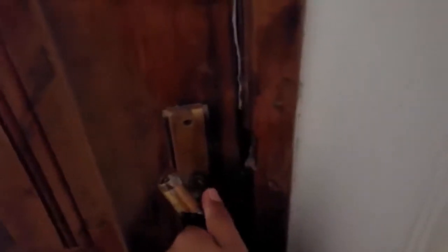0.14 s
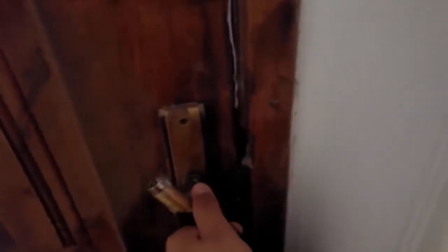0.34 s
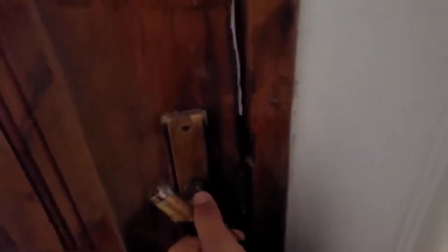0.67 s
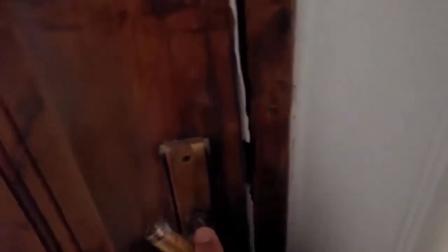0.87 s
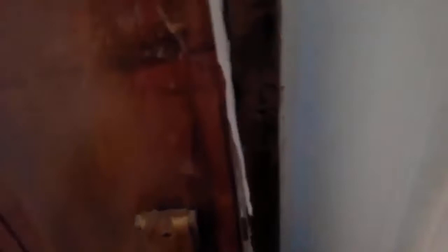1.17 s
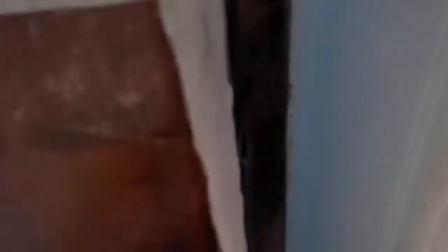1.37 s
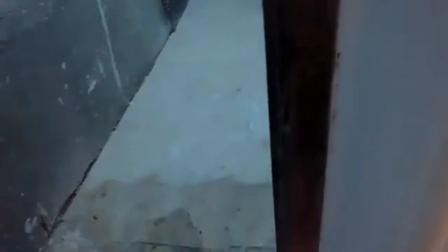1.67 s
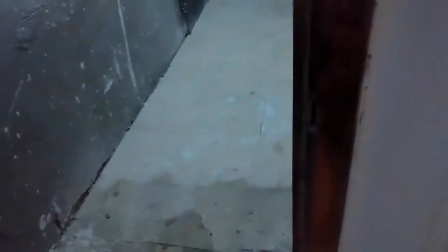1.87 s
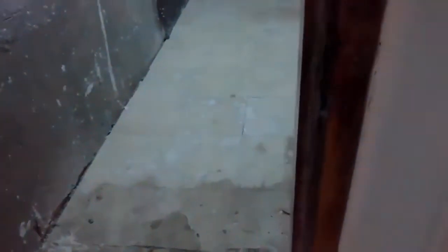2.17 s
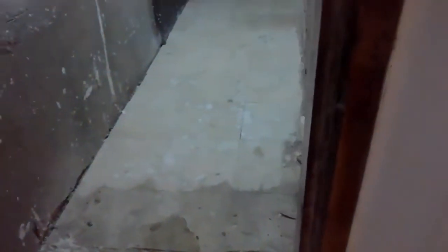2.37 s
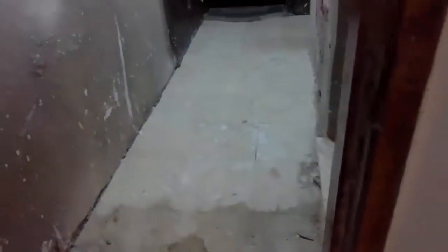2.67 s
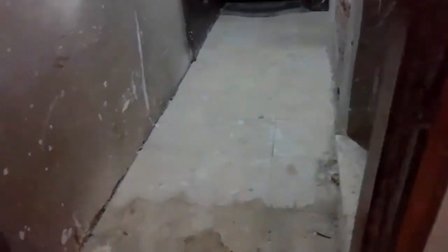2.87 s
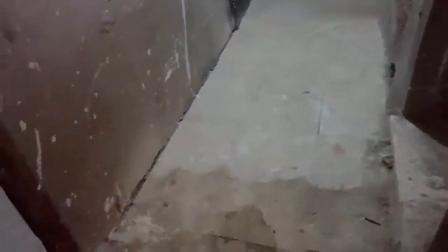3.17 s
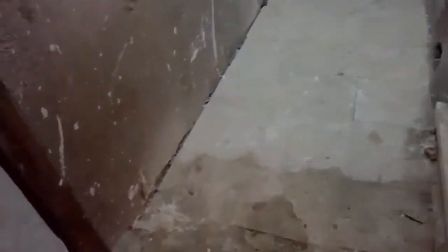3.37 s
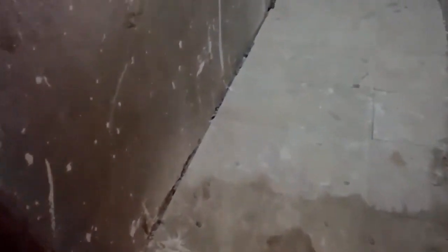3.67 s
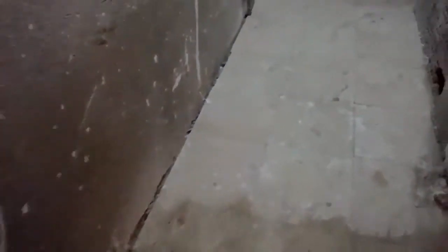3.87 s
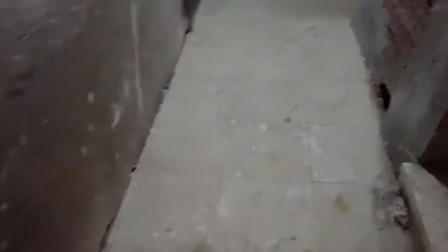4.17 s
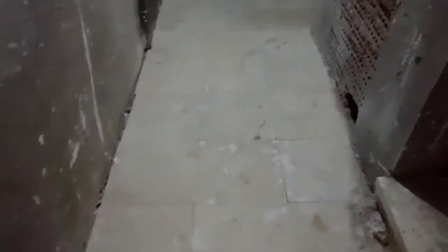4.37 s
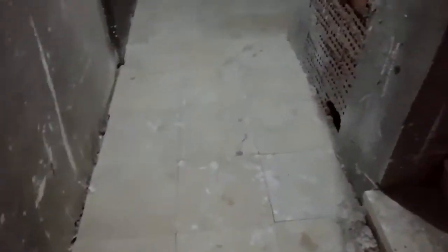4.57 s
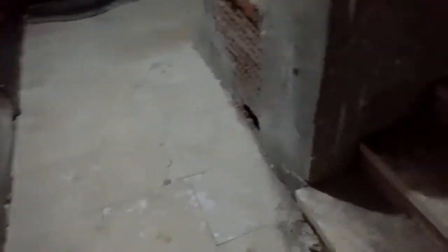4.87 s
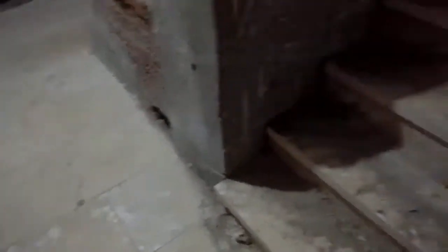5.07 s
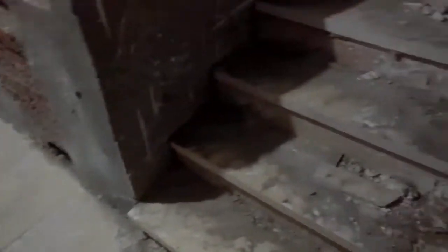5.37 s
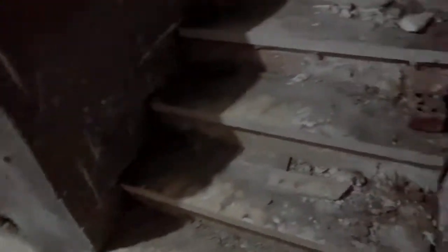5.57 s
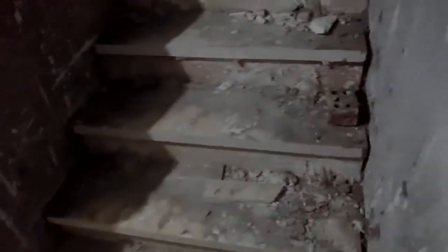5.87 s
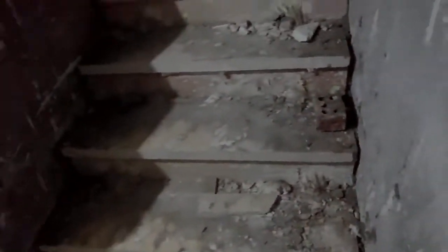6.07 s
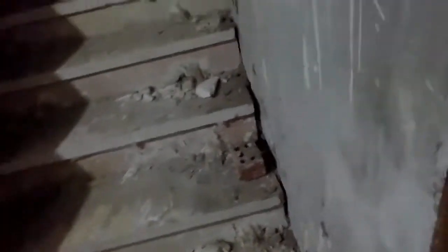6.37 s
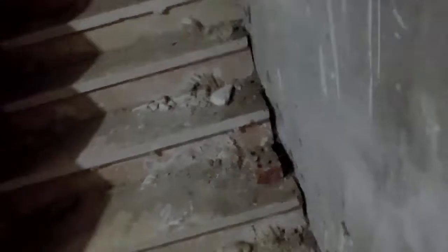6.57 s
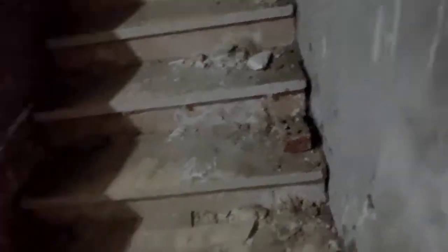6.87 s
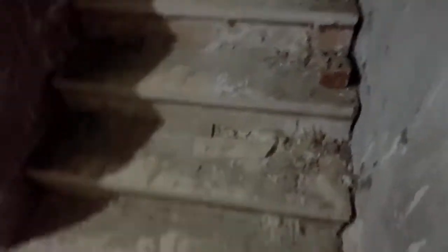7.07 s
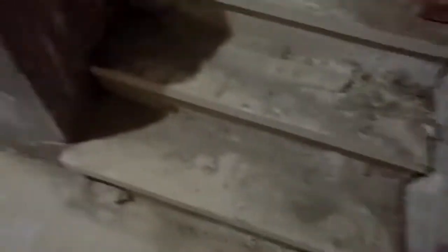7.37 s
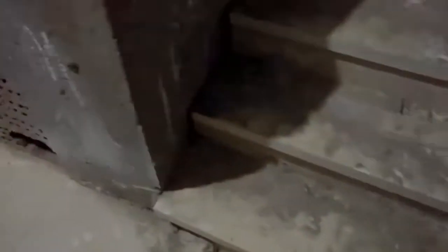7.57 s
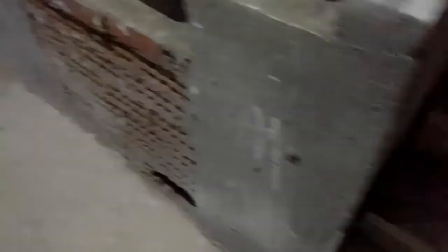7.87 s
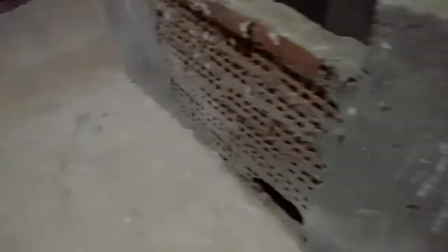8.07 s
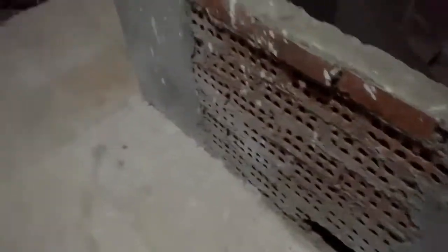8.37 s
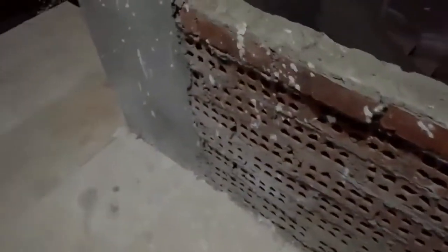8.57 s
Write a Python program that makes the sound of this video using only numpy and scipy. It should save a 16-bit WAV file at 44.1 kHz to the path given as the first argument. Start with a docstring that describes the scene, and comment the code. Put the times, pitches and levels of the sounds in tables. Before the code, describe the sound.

Faint metal clicks and cloth rustle, a soft door release, quiet scuffs, a creaking hinge, then one violent wooden slam with echoing boom.

```python
"""A wooden door: a hand works its latch and pulls it open; it swings back, scrapes its frame and slams.
Knocks are coloured noise bursts plus decaying modes of leaf, plate and bolt; standing waves boom in the stairwell.
Sleeve rustle, shoe scuffs and rubbing are grainy filtered noise; hinge and sole squeak as gliding resonances.
Bare concrete echoes; a far motor hums underneath as wavering sine orders, over still air."""
import sys
import numpy as np
from scipy import signal
from scipy.fft import rfft, irfft, next_fast_len
from scipy.io import wavfile
from scipy.ndimage import uniform_filter1d

SR = 44100
rng = np.random.default_rng(int(sys.argv[2]) if len(sys.argv) > 2 else 0)


def pcm_store(signal):
    """Save signal as 16-bit PCM."""
    levels = np.round(np.clip(np.atleast_2d(signal), -1, 1) * 32767)
    wavfile.write(sys.argv[1], SR, levels.astype(np.int16).T)


N = 384852
TIME_S = np.arange(N) / SR

# Spectrum of a small metal or cloth tick. Each row: frequency in Hz, level in dB per Hz.
CLICK_SPECTRUM = [(100, -18), (600, -4.5), (1500, -0.5), (6000, -1), (15000, -12.5)]
# Lean of near sounds. Each row: frequency in Hz, left minus right in dB.
LEFT_LEAN = [(100, -3.5), (600, 4), (1100, 4), (2000, 0.5), (4000, 7.5), (8000, 13.5), (15000, 6)]


def gain_of(db):
    """Decibels to an amplitude factor."""
    return 10 ** (np.asarray(db) / 20)


def evened(x):
    """Scales to rms 1."""
    return x / np.sqrt(np.mean(x ** 2) + 1e-20)


def read(points, hz):
    """Interpolates a table on a log-frequency axis."""
    f_hz, value = np.transpose(points)
    return np.interp(np.log(hz + 1), np.log(f_hz + 1), value)


def level(rows):
    """A dB curve as a gain over time."""
    return gain_of(np.interp(TIME_S, *np.transpose(rows)))


def held(start_s, attack_s, end_s, release_s, db):
    """Linear attack, hold and release as a gain over time."""
    attack = (TIME_S - start_s) / attack_s
    release = (end_s - TIME_S) / release_s
    return gain_of(db) * np.clip(np.minimum(attack, release), 0, 1)


def stroke(peak_s, length_s, swell_share=0.45):
    """A rounded swell and fade of height 1 with tails even in dB."""
    side_share = np.where(TIME_S < peak_s, swell_share, 1 - swell_share)
    away = (TIME_S - peak_s) / (length_s * side_share)
    return np.exp(3.99 * (1 - np.sqrt(1 + away ** 2)))


def add(mix, start_s, sound):
    """Mixes a sound in at a given time."""
    part = mix[..., round(start_s * SR):][..., :sound.shape[-1]]
    part += sound[..., :part.shape[-1]]


def drift(corner_hz):
    """Low-passed noise of rms 1, for random wavering."""
    size = next_fast_len(N, True)
    lowpass = 1 / (1 + (np.fft.rfftfreq(size, 1 / SR) / corner_hz) ** 4)
    return evened(irfft(rfft(rng.standard_normal(size)) * lowpass, size)[:N])


def colour(x, points, tilt_db=0, size=4096):
    """Minimum-phase filter of unit energy from a spectrum; tilt in dB per octave about 1500 Hz."""
    hz = np.fft.rfftfreq(size, 1 / SR)
    tilt = tilt_db * np.log2(np.maximum(hz, 300) / 1500)
    log_gain = np.log(gain_of(read(points, hz) + tilt))
    mirrored = np.r_[log_gain, log_gain[-2:0:-1]]
    taps = np.fft.ifft(np.exp(np.conj(signal.hilbert(mirrored)))).real
    return signal.oaconvolve(x, taps[None] / np.linalg.norm(taps), axes=1)[:, :x.shape[1]]


def ports(x, near=1):
    """Two microphone ports: they share the bass, and near treble favours the left."""
    # Each row: frequency in Hz, left-right correlation.
    likeness = [(30, 1), (150, 0.84), (280, 0.42), (550, -0.35), (1200, 0.24), (2500, -0.0015)]
    size = next_fast_len(x.shape[1], True)
    hz = np.fft.rfftfreq(size, 1 / SR)
    a, b = rfft(x, size)
    same = np.clip(read(likeness, hz), -1, 1)
    lean = gain_of(near * read(LEFT_LEAN, hz) / 2)
    right = same * a + np.sqrt(1 - same ** 2) * b
    return irfft([a * lean, right / lean], size)[:, :x.shape[1]]


def from_left(x, share, lag_s=.00056):
    """Part of a near sound reaches the right port straight from the left, a moment later."""
    reversed_lean = [(hz, -db) for hz, db in LEFT_LEAN]
    late = colour(np.roll(x[:1], round(lag_s * SR), axis=1), reversed_lean)[0]
    right = np.sqrt(1 - share ** 2) * x[1] + share * evened(late) * np.std(x[1])
    return np.array([x[0], right])


def burst(decay_s, rise_s, size=8192):
    """A puff of stereo noise that swells and dies exponentially."""
    t = np.arange(size) / SR
    return rng.standard_normal((2, size)) * np.exp(-t / decay_s) * (1 - np.exp(-t / rise_s))


def ring(modes, rise_s, scatter=0., bend=1):
    """Decaying modes of one blow, neighbours in opposite senses; bend over 1 holds, then hurries the decay."""
    t = np.arange(2 * SR) / SR
    total = np.zeros(len(t))
    for k, (hz, db, t60_s) in enumerate(modes):
        decay = np.exp(-np.log(1000) * (t / t60_s) ** bend)
        mode_hz = hz * (1 + scatter * rng.standard_normal())
        total += (-1) ** k * gain_of(db) * decay * np.sin(2 * np.pi * mode_hz * t)
    return total * (1 - np.exp(-t / rise_s))


def patchy(x, depth_db):
    """The contact keeps changing, so narrow bands come and go."""
    z = signal.stft(x, nperseg=1024, noverlap=768)[2]
    field = uniform_filter1d(rng.standard_normal(z.shape[1:]), size=6, axis=0)
    field = uniform_filter1d(field, size=16, axis=1)
    return signal.istft(z * gain_of(depth_db * evened(field)), nperseg=1024, noverlap=768)[1][:, :N]


def friction(spectrum, grains_per_s, grain_db, flutter_db, near):
    """Fine hiss with separate catches of fibres or grit, fluttering in strength."""
    caught = rng.random(N) < grains_per_s / SR
    sizes = gain_of(5.0 * np.minimum(rng.exponential(1, N), 4)) * caught
    grain = burst(decay_s=0.0032, rise_s=.0001, size=256)
    grains = evened(signal.oaconvolve(sizes[None], grain, axes=1)[:, :N])
    hiss = rng.standard_normal((2, N))
    rub = evened(patchy(hiss + gain_of(grain_db) * grains, depth_db=2.5))
    return ports(colour(rub * gain_of(flutter_db * drift(25)), spectrum), near)


def squeaks(rows, flutter_db, waver):
    """A rubbing contact sings unevenly in one gliding resonance after another."""
    out = np.zeros((2, N))
    wander = 1 + waver * drift(23)
    for start_s, loudest_s, end_s, first_hz, last_hz, width_hz, db in rows:
        t = np.arange(start_s, end_s, 1 / SR)
        r = np.exp(-np.pi * width_hz / SR)
        rub = rng.standard_normal((2, len(t))) + 1j * rng.standard_normal((2, len(t)))
        glide_hz = np.linspace(first_hz, last_hz, len(t)) * np.interp(t, TIME_S, wander)
        turn = np.exp(2j * np.pi * np.cumsum(glide_hz) / SR)
        # double-pole low-pass noise, shifted up to the gliding pitch
        tone = evened((signal.lfilter([1], np.poly([r, r]), rub) * turn).real)
        add(out, start_s, gain_of(db) * tone * np.interp(t, [start_s, loudest_s, end_s], [0, 1, 0]))
    return ports(out * gain_of(flutter_db * drift(30)), near=0.48)


def background(waver_db=0.35):
    """Far motor hum, slowly running down, as sine orders of its firing rate, over still air."""
    # Orders of the motor. Each row: multiple of the firing rate, level in dB.
    motor_orders = [(.5, -72), (1, -69), (2, -82.5)]
    # Each row: strongest moment in s, length in s, lift in dB.
    hum_swells = [(1.453, 0.5, 7.5), (2.093, 0.65, 17.5), (2.9, 0.47, 5.5), (4.475, 0.56, 11.5)]
    # The stairwell lifts an order passing through: centre in Hz, width in Hz, lift in dB.
    room_hz, width_hz, lift_db = (144.5, 2.2, 6.9)
    # Still air spectrum. Each row: frequency in Hz, level in dB per Hz.
    air_spectrum = [(15, -1), (38, -4.5), (100, -6), (220, -10), (450, -22.5), (1200, -19), (3000, -27),
                    (10000, -34), (15500, -49)]
    # Still air level. Each row: time in s, level in dB.
    air_level = [(0, -64.5), (4, -64), (6.2, -66), (7.2, -77), (8.73, -70)]
    firing_hz, sag_hz_per_s = 76.2, 0.93
    dull_s, dull_db_per_s = 7.51, 14  # onset; loss per octave above the lowest order
    rate_hz = firing_hz - sag_hz_per_s * TIME_S
    turns = np.cumsum(rate_hz * (1 + 0.0053 * drift(2.4))) / SR
    swell_db = sum(db * np.exp(-(2 * (TIME_S - s) / length_s) ** 2) for s, length_s, db in hum_swells)
    dulling_db = dull_db_per_s * np.maximum(TIME_S - dull_s, 0)
    hum = np.zeros(N)
    for multiple, db in motor_orders:
        room_db = lift_db / (1 + (2 * (multiple * rate_hz - room_hz) / width_hz) ** 2)
        order_db = db + swell_db + room_db - dulling_db * np.log2(2 * multiple) + waver_db * drift(5)
        hum += np.sqrt(2) * np.sin(2 * np.pi * multiple * turns) * gain_of(order_db)
    air = ports(colour(rng.standard_normal((2, N)), air_spectrum), near=.2)
    return hum + air * level(air_level)


def rustle():
    """Sleeves, shoes and hands rub in strokes; a smoother rub follows each swing of the door."""
    # Each row: strongest moment in s, length in s, sleeve rustle in dB, shoe and hand scuff in dB.
    moves = [(0.128, 0.36, -58.5, -55), (0.356, 0.083, -64.5, -60), (0.706, 0.18, -46.5, -51.5),
             (0.877, 0.28, -56, -53), (1.196, 0.065, -61.5, -71), (1.785, 0.27, -56, -57.5),
             (3.117, 0.33, -64, -64), (3.735, 0.26, -60.5, -65.5), (4.272, 0.13, -53, -55.5),
             (4.402, 0.26, -55.5, -55), (4.97, 0.34, -59.5, -62), (5.919, 0.37, -68.5, -63),
             (6.271, 0.14, -54, -49.5), (7.411, 0.16, -65.5, -87.5), (7.562, 0.18, -56.5, -55.5),
             (7.833, 0.53, -64, -63), (8.131, 0.11, -60.5, -64), (8.322, 0.083, -70, -91.5)]
    # Spectra of the four rubs. Each row: frequency in Hz, level in dB per Hz.
    sleeve_spectrum, scuff_spectrum = [(400, -22), (1100, -16), (2000, 0.5), (3200, 0.5), (5500, -2.5),
                                       (8000, -7.5), (15500, -10.5)], [(80, -11.5), (250, -4.5), (600, 1.5), (1150, 1.5),
                                                       (1900, -1.5), (3000, -4), (9000, -29)]
    opening_spectrum, closing_spectrum = [(240, -55.5), (400, -11), (683, -12.5), (900, -0.5), (1200, 2),
                                          (2360, 4), (2880, -1.5), (3850, -2), (12700, -16), (15500, -25)], [(200, -8), (480, -6), (700, -4), (1400, -11),
                                                               (3000, -1.5), (5500, 2.5), (9000, -4.5),
                                                               (15500, -9.5)]
    # Door swings: start in s, attack in s, end in s, release in s, rubbing in dB (closing: before it binds).
    opening_swing, closing_swing = (.74, .95, 3.24, .95, -52), (5, 0.49, 6.5, 1, -56)
    # the closing edge binds in the frame and rubs harder
    bind_s, bind_spread_s, bind_db = 6.28, 0.082, 18
    sleeve_power, scuff_power = np.zeros(N), np.zeros(N)
    for peak_s, length_s, sleeve_db, scuff_db in moves:
        power = stroke(peak_s, length_s)
        sleeve_power += power * gain_of(sleeve_db) ** 2
        scuff_power += power * gain_of(scuff_db) ** 2
    binding = gain_of(bind_db * np.exp(-((TIME_S - bind_s) / bind_spread_s) ** 2 / 2))
    sleeve = friction(sleeve_spectrum, grains_per_s=550, grain_db=-5.0, flutter_db=2.0, near=0.9)
    scuff = friction(scuff_spectrum, grains_per_s=240, grain_db=-4, flutter_db=1.0, near=0.85)
    opening = friction(opening_spectrum, grains_per_s=440, grain_db=-10.5, flutter_db=1.0, near=0.86)
    closing = friction(closing_spectrum, grains_per_s=900, grain_db=-8.5, flutter_db=1.5, near=0.91)
    strokes = sleeve * np.sqrt(sleeve_power) + scuff * np.sqrt(scuff_power)
    swings = opening * held(*opening_swing) + closing * held(*closing_swing) * binding
    return from_left(strokes + swings, share=0.024)


def clicks():
    """Short dry noise ticks of the latch and of clothing."""
    # Each row: time in s, level in dB.
    ticks = [(0.068, -42), (.134, -42.5), (0.154, -53), (.169, -51), (.254, -46), (.31, -41),
             (0.358, -39.5), (.585, -43.5), (0.6, -48), (.634, -47), (.726, -37), (.836, -43), (0.876, -50),
             (0.926, -38), (.94, -41), (.955, -45), (4.404, -38)]
    out = np.zeros((2, N))
    for s, db in ticks:
        add(out, s, gain_of(db) * colour(burst(decay_s=0.0016, rise_s=0.0003), CLICK_SPECTRUM))
    return ports(out, near=0.72)


def stairwell(x, build_up_s, bend=1.29):
    """Dense echoes from bare concrete: each band holds a moment, then dies at its own speed."""
    # Each row: frequency in Hz, t60 in s.
    band_decay = [(60, 1), (170, 0.74), (560, 0.62), (1100, 0.66), (1800, 0.56), (2900, 0.37),
                  (14000, 0.29)]
    hz, t, z = signal.stft(rng.standard_normal((2, SR + SR // 2)), SR, nperseg=512)
    t60_s = read(band_decay, hz)[:, None]
    tail = signal.istft(z * np.exp(-np.log(1000) * (t / t60_s) ** bend), SR)[1]
    build_up = 1 - np.exp(-np.arange(tail.shape[1]) / SR / build_up_s)
    tail = ports(tail * build_up, near=0.7)
    return signal.fftconvolve(x.mean(0)[None], tail / np.linalg.norm(tail[0]), axes=1)[:, :N]


def bolt():
    """The bolt slips off its keeper; each slip is a short scrape that sets its resonances ringing."""
    # Each row: time in s, level in dB, brightness in dB per octave.
    slips = [(1.271, -52, -1), (1.288, -44, 17), (1.297, -43.5, -4), (1.311, -46.5, -10)]
    # Each row: resonance in Hz, width in Hz, level in dB.
    resonances = [(1140, 54, -5.5), (1960, 270, -2.5), (2700, 270, 6.5), (3660, 150, 1), (4600, 200, -9.5),
                  (5460, 350, -17)]
    out, t = np.zeros((2, N)), TIME_S[:SR // 20]
    pivot_hz = resonances[2][0]
    for s, db, tilt_db in slips:
        scrape = burst(decay_s=0.011, rise_s=0.004)
        for hz, width_hz, mode_db in resonances:
            mode = np.exp(-np.pi * width_hz * t) * np.sin(2 * np.pi * hz * t)
            gain = gain_of(db + mode_db + tilt_db * np.log2(hz / pivot_hz)) / np.linalg.norm(mode)
            add(out, s, gain * signal.fftconvolve(scrape, mode[None], axes=1))
    return ports(out, near=0.35)


def rattles(tap_db=7.5):
    """The loose bolt taps its keeper: a noise tick, and the steel rings on."""
    # Each row: time in s, level in dB.
    taps = [(1.292, -51.5), (6.558, -53), (6.567, -60), (6.631, -55), (6.699, -63)]
    # Latch steel modes. Each row: frequency in Hz, level in dB, t60 in s.
    steel = [(1152, -2, .45), (2690, -5, .17), (3990, -4, .04), (6620, 3, .03)]
    out = np.zeros((2, N))
    for s, db in taps:
        tap = gain_of(tap_db) * colour(burst(decay_s=0.0018, rise_s=0.00037), CLICK_SPECTRUM)
        add(out, s, gain_of(db) * tap)
        add(out, s, gain_of(db) * ring(steel, rise_s=.0004))
    return out


def door(rough_db=-1.5):
    """Each blow on the frame crunches wood in quick uneven slips, thumps the leaf and clacks the latch plate."""
    # Each row: time in s, crunch in dB, brightness in dB per octave, panel thud in dB, latch clack in dB.
    blows = [(1.315, -44.5, -0.5, -60, -50), (1.338, -52, -0.5, -46.5, -62),
             (6.285, -24.5, 0.5, -48.5, -44.5), (6.3, -18, 1, -17.5, -40.5), (6.312, -18, -1, -4, -37.5),
             (6.327, -14, 1, -16.5, -23.5), (6.3661, -14.5, -1.26, -4, -15),
             (6.3745, -15, -7.5, -30, -36.5), (6.388, -21.5, 0.55, -14, -31), (6.4179, -17, -5, -24, -8.5),
             (6.452, -24.5, -7.5, -17, -46), (6.486, -33.5, -7.5, -16, -49.5),
             (6.558, -34.5, -1.5, -39, -36), (7.03, -73, 2, -56.5, -84)]
    # Each row: frequency in Hz, level in dB per Hz.
    crunch_spectrum = [(30, -8), (120, -6), (340, -2), (520, 2.5), (1100, 3), (1750, -1.5), (4000, -10.5),
                       (7000, -21), (15500, -29.5)]
    # Modes of the wooden leaf and the latch plate. Each row: frequency in Hz, level in dB, t60 in s.
    panel, plate = [(160.3, 4.5, 0.066), (284, -17, 0.054), (338, -9.5, 0.06), (410.2, -14, 0.066),
                    (530.2, -14.5, 0.087)], [(890, -9, 0.054), (1045, -4, 0.046), (1216, -4.5, 0.057),
                                   (1410, -5.5, 0.037), (1790, -12, 0.026)]
    light_decay_s, firm_db = 0.038, -16  # a blow of firm_db decays in half the light time
    crunch, thud, clack = np.zeros((2, N)), np.zeros(N), np.zeros(N)
    roughness = evened(gain_of(rough_db * drift(400)))
    for s, crunch_db, tilt_db, thud_db, clack_db in blows:
        decay_s = light_decay_s / (1 + gain_of(crunch_db - firm_db) ** 2)
        wood = colour(burst(decay_s, rise_s=0.00026), crunch_spectrum, tilt_db)
        add(crunch, s, gain_of(crunch_db) * wood)
        add(thud, s, gain_of(thud_db) * ring(panel, rise_s=0.0055))
        add(clack, s, gain_of(clack_db) * ring(plate, rise_s=.001, scatter=0.0094))
    return ports(crunch * roughness, near=0.79), thud * np.ones((2, 1)), clack


def boom():
    """Air shoved by the leaf sets the stairwell's standing waves going."""
    # Each row: time in s, level in dB.
    shoves = [(1.332, -43.5), (6.358, 0.5)]
    # Each row: frequency in Hz, level in dB, t60 in s.
    standing_waves = [(34, -12.5, 0.14), (54.6, -12, 1), (62, -23.5, 0.63), (82.5, -19, 0.87),
                      (97.3, -26, .85), (144.5, -31, 0.99), (161.6, -13.5, .72), (190.6, -26, 0.5),
                      (232.6, -23, 0.82), (269.4, -18.5, 0.62), (327.3, -24.5, 0.52), (414.5, -27, 0.26),
                      (510, -28, 0.17)]
    out = np.zeros(N)
    for s, db in shoves:
        add(out, s, gain_of(db) * ring(standing_waves, rise_s=.014, bend=1.21))
    return out


def sole_squeak():
    """A sole squeaks as it turns: friction excites a falling resonance."""
    # Each row: start in s, loudest in s, end in s, first Hz, last Hz, pole width in Hz, level in dB.
    turns = [(4.1, 4.28, 4.62, 2103, 1780, 300, -60.5)]
    return squeaks(turns, flutter_db=5.0, waver=0.011)


def steps():
    """Soles land softly on gritty concrete as coloured noise bursts."""
    # Each row: time in s, level in dB, brightness in dB per octave.
    landings = [(4.268, -51, -7.5), (4.31, -52.5, -9), (4.421, -58, -8), (4.97, -44, 2)]
    # Each row: frequency in Hz, level in dB per Hz.
    sole_spectrum = [(60, -9), (160, -9.5), (400, -7.5), (750, -3.5), (1150, -3), (1700, -20.5),
                     (3500, -18), (9000, -33)]
    out = np.zeros((2, N))
    for s, db, tilt_db in landings:
        add(out, s, gain_of(db) * colour(burst(decay_s=0.03, rise_s=0.0051), sole_spectrum, tilt_db))
    return ports(out, near=0.9)


def hinge_squeaks():
    """The rubbing hinges sing in gliding resonances as the door swings back."""
    # Each row: start in s, loudest in s, end in s, first Hz, last Hz, pole width in Hz, level in dB.
    glides = [(5.23, 5.294, 5.56, 8600, 8000, 1000, -54), (5.25, 5.38, 5.41, 7600, 6720, 1200, -55),
              (5.39, 5.45, 5.56, 4280, 4150, 250, -57.5), (5.48, 5.56, 5.76, 4160, 3900, 300, -55.5),
              (5.51, 5.57, 6.3, 1990, 1995, 180, -58.5), (5.55, 5.69, 5.78, 2150, 2155, 450, -55)]
    return squeaks(glides, flutter_db=1.0, waver=0.011)


def groan():
    """The loaded hinge sticks and slips at a rough, slowly rising rate."""
    # Envelope: start in s, attack in s, end in s, release in s, level in dB.
    envelope = (5.65, .06, 6.33, .06, -61.5)
    start_hz, rise_hz_per_s = 294, 30
    hz = start_hz + rise_hz_per_s * (TIME_S - envelope[0])
    phase = 2 * np.pi * np.cumsum(hz * (1 + 0.05 * drift(110))) / SR
    overtone = gain_of(-14) * np.sin(2 * phase) * drift(60)
    tone = np.sqrt(2) * (np.sin(phase) + overtone)
    return tone * held(*envelope) * (1 + .45 * drift(45))


def scene():
    """All sources, with echoes of the door and the small sounds."""
    crunch, thud, clack = door()
    small = clicks() + rattles() + bolt() + hinge_squeaks() + steps() + sole_squeak()
    door_send = gain_of(-4.5) * crunch + gain_of(-3.5) * thud + gain_of(-12.5) * clack
    echoes = stairwell(door_send + gain_of(-4) * small, build_up_s=0.0079)
    return crunch + thud + clack + small + echoes + groan() + boom() + rustle() + background()


def record(dry, ceiling=0.95, edge_hz=15700):
    """Rounds off the loudest swings, then limits the band."""
    rounded = dry / (1 + (dry / ceiling) ** 4) ** (1 / 4)
    lowpass = signal.firwin(511, edge_hz, window=("kaiser", 9), fs=SR)
    return signal.oaconvolve(rounded, lowpass[None], "same")


dry = scene()
out = record(dry)
pcm_store(out)
```